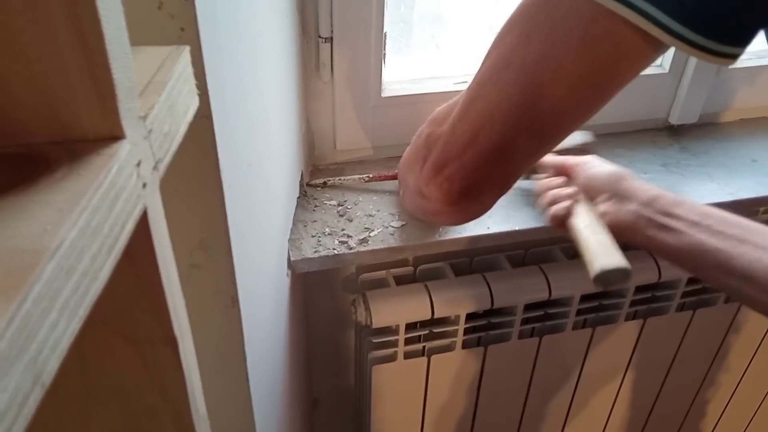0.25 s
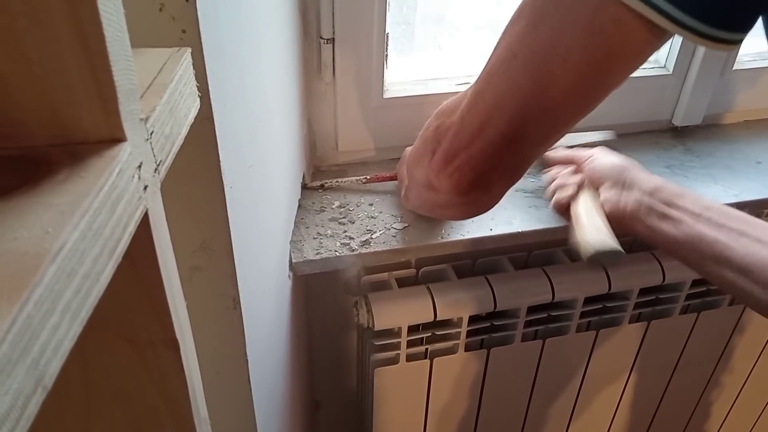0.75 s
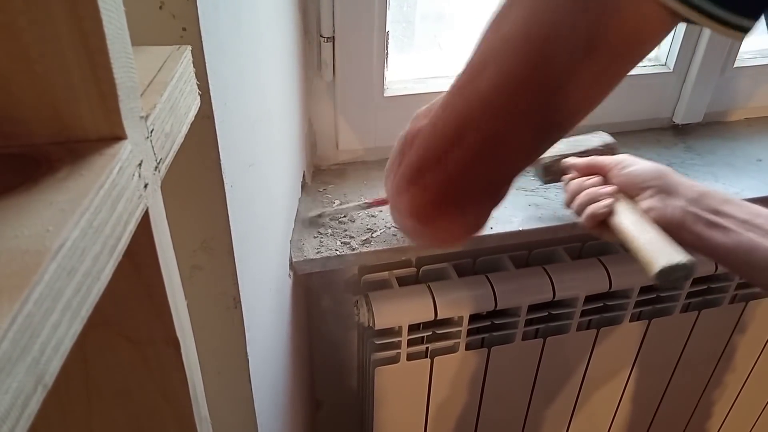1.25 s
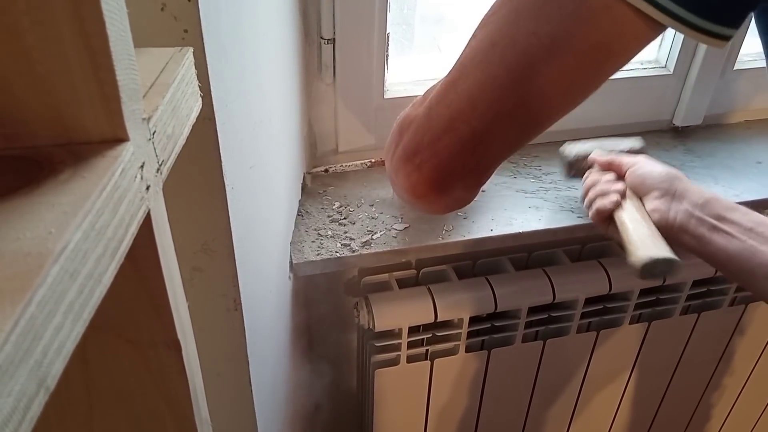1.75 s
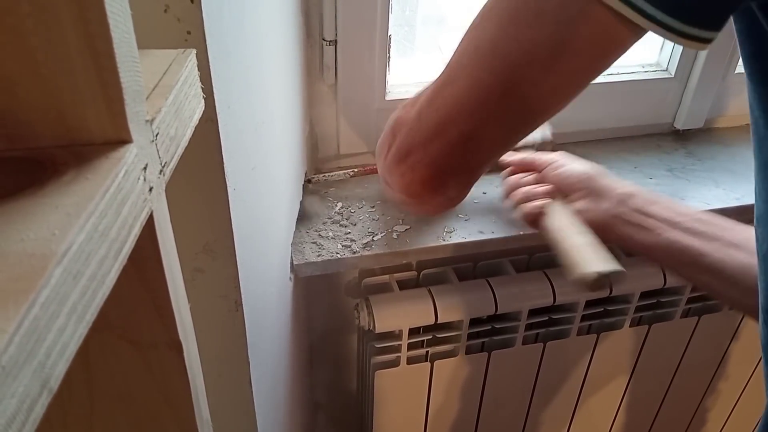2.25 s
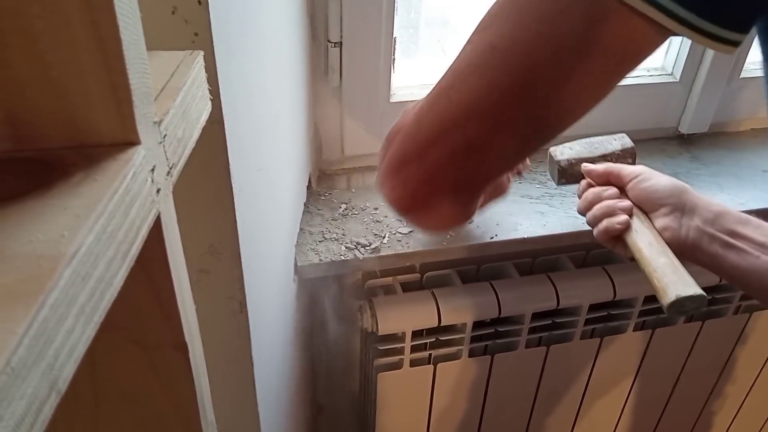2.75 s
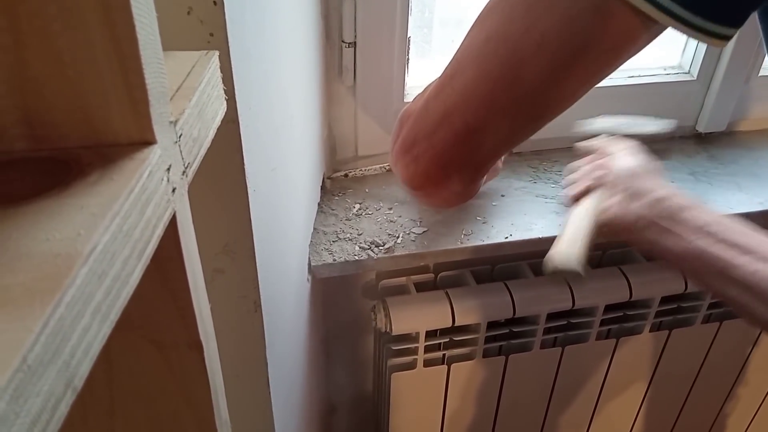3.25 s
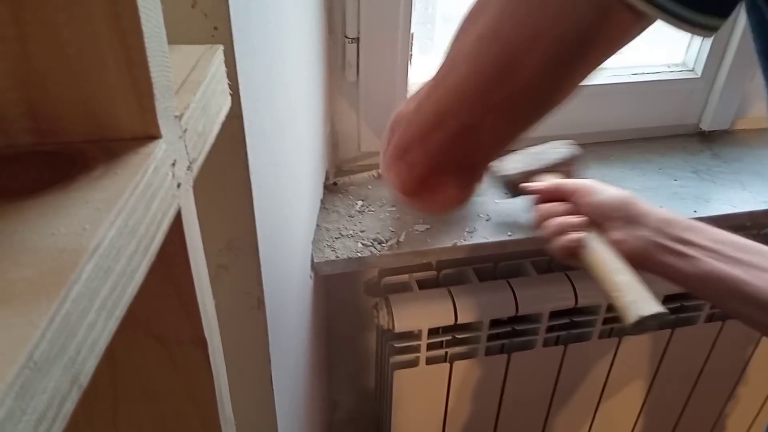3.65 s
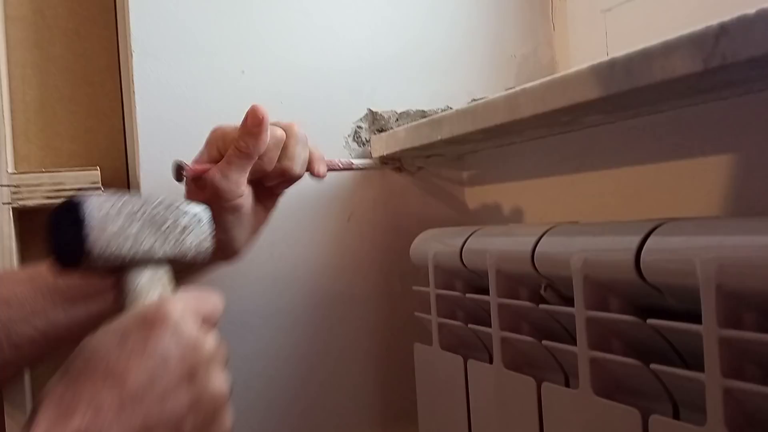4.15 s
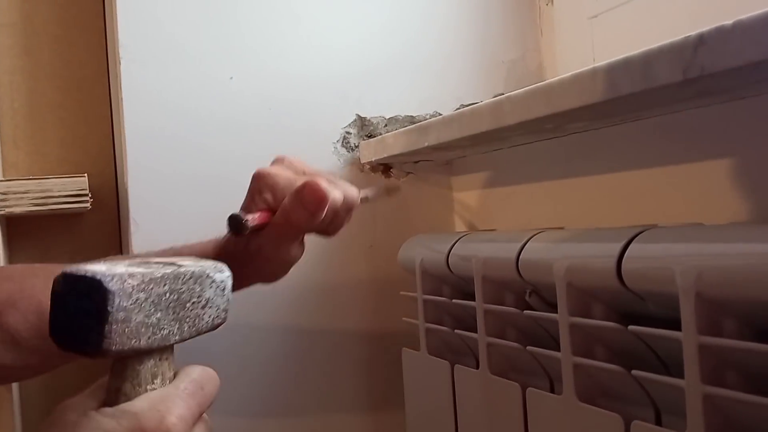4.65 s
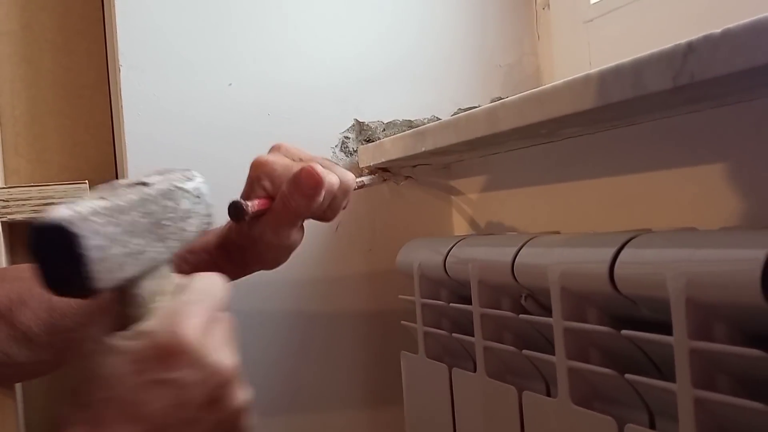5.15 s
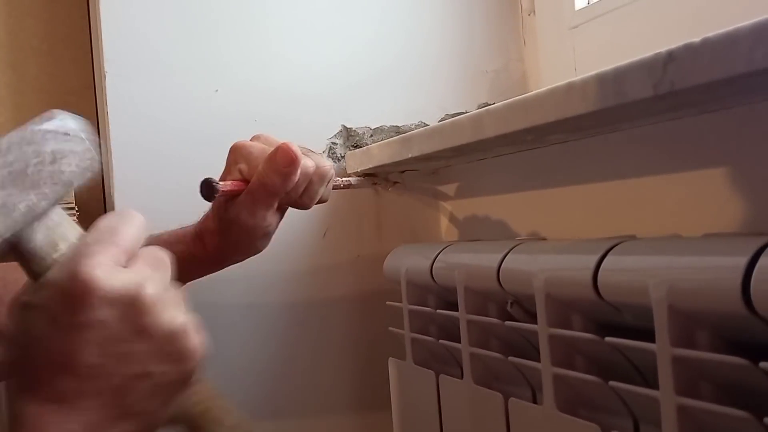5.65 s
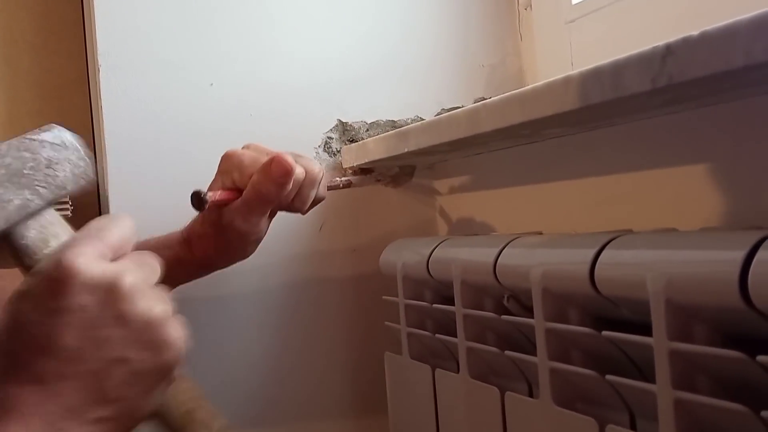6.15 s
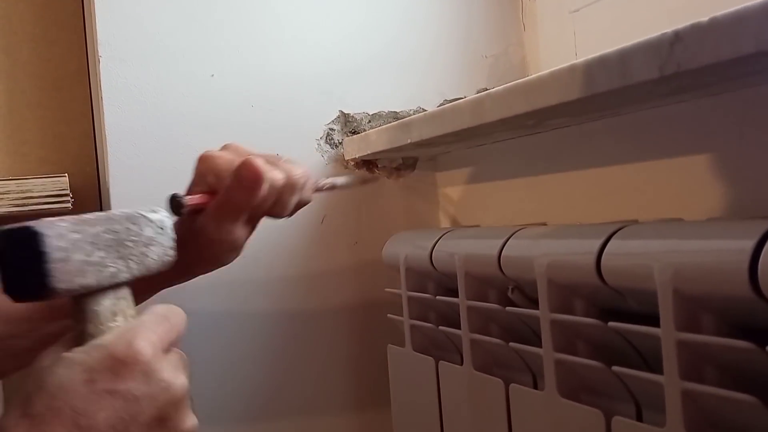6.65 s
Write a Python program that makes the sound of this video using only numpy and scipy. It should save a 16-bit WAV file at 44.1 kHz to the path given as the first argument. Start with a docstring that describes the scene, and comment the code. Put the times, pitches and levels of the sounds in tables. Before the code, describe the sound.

Close, nearly mono sound of chiselling in a hard-walled room: five sharp steel-on-steel blows, a pause with a dull bump, three heavier strikes, then stone fragments knocking and clicking between two isolated blows. Sound cuts out briefly, returning with a resonant radiator clang, light skipping taps, and a final steady run of blows with scraping and hollow slab resonance.

```python
"""Chiselling mortar in a bare room

A lump hammer drives a steel chisel into the mortar round a stone window sill: each blow is a noise crack
through the wedged blade's resonances, with low thuds, sine pings and diffuse echo. Chips snap as short
noise, the blade scrapes in clumped noise; after a short silence the chisel clangs on a radiator (dense
noise and dying sines) and work goes on below the sill. A limiter flattens the blows; the room swells behind."""
import sys
import numpy as np
from scipy import signal
from scipy.fft import rfft, irfft
from scipy.io import wavfile
from scipy.ndimage import uniform_filter1d, minimum_filter1d

SR = 44100
rng = np.random.default_rng(int(sys.argv[2]) if len(sys.argv) > 2 else 0)


def generate_wav(sig):
    """Save sig (samples, or channels by samples) to the path in sys.argv[1] as 16-bit PCM at SR."""
    pcm = np.round(np.clip(np.atleast_2d(sig).T, -1, 1) * 32767).astype(np.int16)
    wavfile.write(sys.argv[1], SR, pcm)


N = 303408
T = np.arange(SR) / SR  # one second: the life of any single sound
HZ = np.fft.rfftfreq(SR, 1 / SR) + 1  # kept above zero for the logarithms

# hammer blows: [t/s, force/dB, crack length/s, wall thud re force/dB, brightness/(dB per octave),
# steel ping level/dB, top ring/dB, pitch of the wedged blade/ratio, depth of its resonances/ratio]
BLOWS = [(0.179, -22, 0.0081, -14, 0, -43, -2, 1.01, 0.49),
         (0.4407, -19, 0.011, -18, 0.5, -34, -3, 0.95, 1.3),
         (0.6774, -20.5, .012, -3.5, -0.5, -45, 0, 1, 0.99),
         (0.905, -17.5, .012, -5, 0.5, -35, 2, 0.952, 1.3),
         (1.1095, -18.5, .012, -14, 0, -32, -5, 0.96, 1.18),
         (1.9832, -21.5, 0.015, 0, 1.66, -51, 0, 1, 0.71),
         (2.2295, -20.5, 0.014, 1.5, 1, -40, 14.5, 0.98, 1.44),
         (2.4709, -17, 0.014, -4.5, 2, -39, -8, 1.24, 0.23),
         (3.3406, -22, 0.011, 1, 0, -54, 11, 0.99, 1.25),
         (4.0125, -30.5, 0.0095, 0.5, 1, -48.5, -4, 1.1, 0.56),
         (5.2707, -24.5, 0.0093, -7.5, 0.05, -71, 1, 1.03, 0.28),
         (5.5209, -17.5, 0.013, -8.5, 1, -48, 4, 0.99, 0.91),
         (5.7656, -16.5, 0.017, -3, 1.5, -39, 3, 0.97, 1.26),
         (6.0285, -18.5, 0.011, -34, 0.7, -41, -11, 0.96, 0.68),
         (6.2676, -15.5, 0.014, -12, 0.5, -44, 15, 0.91, 0.93)]


def amp(db):
    """Decibels to a linear factor."""
    return 10 ** (np.asarray(db) / 20)


def evened(x):
    """The signal at unit RMS."""
    return x / np.sqrt(np.mean(x ** 2) + 1e-20)


def read(points, hz):
    """A curve through (f/Hz, value) points, straight over log frequency."""
    f, value = np.transpose(points)
    return np.interp(np.log(hz + 1), np.log(f), value)


def add(mix, s, sound):
    """Lay a sound into the mix at s seconds, cut at the end of the mix."""
    part = mix[round(s * SR):][:len(sound)]
    part += sound[:len(part)]


def noise(shape_db):
    """One second of unit-RMS noise with the given spectral shape."""
    return evened(irfft(rfft(rng.standard_normal(SR)) * amp(shape_db), SR))


def hump(hz, octaves, depth_db=34, steepness=1.39):
    """A broad flat-topped resonance in dB, with level skirts."""
    distance = abs(np.log2(HZ / hz) / octaves)
    return -depth_db * np.tanh(6.6 * distance ** steepness / depth_db)


def peak(hz, half_width_hz):
    """A narrow resonance of height one."""
    return 1 / (1 + ((HZ - hz) / half_width_hz) ** 2)


def ripple(width_hz):
    """Random peaks and dips of unit size along the spectrum, as from many close modes."""
    smoothing = np.exp(-(HZ / SR * width_hz * 2) ** 2)
    return evened(irfft(rfft(rng.standard_normal(SR)) * smoothing, SR)[:len(HZ)])


def ring(modes):
    """Dying sines, one per mode, each struck a little differently every time."""
    total = 0
    for hz, db, t60 in modes:
        level_db = db + 2 * rng.standard_normal() - 60 * T / t60
        total = total + amp(level_db) * np.sin(2 * np.pi * (hz * T + rng.random()))
    return total


def die_away(x, t60s):
    """Each frequency band dies at its own speed."""
    hz, t, z = signal.stft(x, SR, nperseg=256)
    decay = amp(-60 * t / read(t60s, hz)[:, None])
    return signal.istft(z * decay, SR, nperseg=256)[1][:SR]


def room(shape_db, build_s=0.014):
    """The diffuse answer of bare walls to a click of this spectrum: it builds up, then the bands decay."""
    # decay of the room: [f/Hz, t60/s]
    room_t60 = [(80, 0.75), (210, 0.73), (560, 0.7), (1470, 0.57), (3880, 0.46), (7000, 0.43),
                (14000, 0.26)]
    return die_away(noise(shape_db), room_t60) * (1 - np.exp(-T / build_s))


def boom(db, hz, t60):
    """A low, narrow resonance of masonry dying away."""
    return amp(db - 60 * T / t60) * noise(hump(hz, 0.21, 70, steepness=3.0))


def snap(db, hz, t60, room_db, octaves, uneven_db=2.5):
    """Stone hardly rings: a short dry snap and its echo."""
    stone = [(60, -21.5), (300, 8.5), (7500, -5.0), (12000, -18.5), (16000, -2.5)]  # [f/Hz, tone/dB]
    shape = hump(hz, octaves) + uneven_db * ripple(160) + read(stone, HZ)
    direct = noise(shape) * amp(-60 * T / t60)
    return amp(db) * (direct + amp(room_db) * room(shape))


def trickle(per_s=22, grain_db=7, grit_db=-61, hush_db=-67):
    """Loose sand trickles as random grain bursts from the first blow on, over the steady hush of the room."""
    # spectrum of the room's hush: [f/Hz, relative density/(dB per Hz)]
    hush_spectrum = [(30, -23.5), (110, -4), (500, -1.5), (1500, -17), (4000, -17), (7000, -4),
                     (12000, -24), (16000, -25)]
    hits = rng.random(N) < per_s / SR
    falls = hits * amp(grain_db * np.minimum(rng.exponential(1, N), 2))
    grain = noise(read([(500, 6.0), (3000, 5.5), (6800, 0.0), (9000, 3.5), (12000, -15.0)], HZ))
    decay = amp(-60 * T / 0.068) + amp(-8.5 - 60 * T / 0.12)  # a short fall and a quieter, longer one
    grit = signal.oaconvolve(falls, grain * decay)[:N]
    worked = np.arange(N) / SR > BLOWS[0][0]
    hz = np.fft.rfftfreq(N, 1 / SR)
    hush = evened(irfft(rfft(rng.standard_normal(N)) * amp(read(hush_spectrum, hz)), N))
    return amp(grit_db) * evened(grit) * worked + amp(hush_db) * hush


def masonry():
    """The wall booms once under a bump; the slab of the sill answers the last two blows hollowly."""
    # a dull bump against the wall: [t/s, level/dB, f/Hz, t60/s]
    bumps = [(1.607, -39, 113, .62)]
    # blows that shake the slab: [t/s, level/dB]
    slab_booms = [(6.029, -22.5), (6.268, -16)]
    # hollow resonances of the slab: [f/Hz, level re boom/dB, t60/s]
    slab = [(264, -5.5, 0.41), (376, -7.5, 0.3)]
    out = np.zeros(N)
    for s, *bump in bumps:
        add(out, s, boom(*bump))
    for s, level in slab_booms:
        add(out, s, sum(boom(level + db, hz, t60) for hz, db, t60 in slab))
    return out


def radiator(fins_db=-18, sections_db=-29, uneven_db=5):
    """The struck radiator's dense ring fades in, then dies with a few sections singing on."""
    # level of the fade-in: [t/s, level/dB]
    fade_in = [(4.265, -18.5), (4.315, -14), (4.365, -2.5), (4.45, -0.5)]
    # spectrum of the fins: [f/Hz, relative density/(dB per Hz)]
    fin_spectrum = [(100, -20.5), (300, -18), (480, -8), (660, 1), (950, -11), (1300, -5), (1900, 2.5),
                    (2250, -11.5), (2800, -3.5), (3400, -8), (4000, -16), (7000, -17), (12000, -44)]
    # ringing sections: [f/Hz, relative level/dB, t60/s]
    sections = [(269, -19, 2), (382, -4.5, 1.36), (481, 3, 1), (530, -2, 1.2), (572, -3, 1.23),
                (659, -1, 1.11), (1280, -12.5, 1.46), (1322, -12.5, 1.65), (1430, -16, 0.55),
                (1653, -19, 0.63), (1750, -11, 1), (2050, -16, 0.47), (2000, 5.5, 0.77), (1970, -0.5, 1.07),
                (2712, 11.5, 0.37), (2740, -7.5, 1.12), (2660, 8, 0.36), (3230, -18.5, 1.8)]
    start = fade_in[0][0]
    clang = noise(read(fin_spectrum, HZ) + uneven_db * ripple(4.1))
    fins = die_away(clang, [(300, 1.0), (2000, 0.93), (7000, 0.76)])
    level = amp(np.interp(start + T, *np.transpose(fade_in))) * np.minimum(T / 0.0021, 1)
    out = np.zeros(N)
    add(out, start, level * (amp(fins_db) * fins + amp(sections_db) * ring(sections)))
    return out


def scrapes(grain_db=2.5, room_db=-11, uneven_db=3):
    """Sand grains break under the blade in clumps: band noise with a grainy level, swelling and fading."""
    # strokes in mortar: [t/s, length/s, level before the swell/dB, centre f/Hz, width/octaves]
    strokes = [(2.441, 0.015, -36.5, 5700, 0.72), (3.733, .02, -42.5, 5500, 2.1),
               (3.779, 0.02, -41.5, 5500, 3.6), (4.208, 0.23, -46, 2500, 1.4),
               (4.237, 0.13, -38, 5950, .53), (5.082, 0.037, -48, 2560, 3.5),
               (5.891, 0.077, -28.5, 6240, 0.67), (5.922, 0.1, -28.5, 1480, 1.03),
               (6.803, 0.024, -39.5, 6680, .6), (6.83, 0.048, -36.5, 3500, 3)]
    out = np.zeros(N)
    for s, length, db, hz, octaves in strokes:
        shape = hump(hz, octaves, steepness=3.8) + uneven_db * ripple(200)
        shape += read([(7500, 3.5), (12000, -3.5)], HZ)
        swell = np.sin(np.pi * np.minimum(T / length, 1)).clip(0) ** .5
        clumps = amp(grain_db * evened(uniform_filter1d(rng.standard_normal(SR), size=90)))
        direct = evened(noise(shape) * clumps) * swell
        add(out, s, amp(db) * (direct + amp(room_db) * room(shape, length / 2)))
    return out


def loose_chisel(count=4, waver=0.75, start_s=4.543, every_s=.118, first_db=-28.5, fade_db=-3):
    """Out of the mortar the steel rings freely in its modes; its tip skips evenly over the radiator's ribs."""
    # clinks: [t/s, level/dB]
    clinks = [(3.598, -37.5), (3.739, -49), (3.797, -44), (4.243, -36)]
    # lengthwise and bending modes of the steel: [f/Hz, relative level/dB, t60/s]
    steel = [(4550, 0.5, 0.1), (7020, 6, 0.095), (10360, 3, 0.085), (11340, -14.5, 0.62),
             (13400, -26.5, .16), (14500, -10, 0.27)]
    out = np.zeros(N)
    for s, db in clinks:
        # reflections blur the lines
        flutter = 1 + waver * evened(uniform_filter1d(rng.standard_normal(SR), size=200))
        add(out, s, amp(db) * ring(steel) * flutter * (1 - np.exp(-T / 0.00085)))
    for k in range(count):
        # each skip is lighter than the last
        skip = snap(first_db + k * fade_db, hz=7340, t60=0.049, octaves=0.65, room_db=-15)
        add(out, start_s + k * every_s, skip)
    return out


def chips():
    """Lumps knock dully, chips snap over a wide band, the tip ticks high and narrow: all short noise."""
    # lumps of mortar knock on the sill: [t/s, level/dB, centre f/Hz, t60/s]
    knocks = [(1.589, -41.5, 860, 0.078), (1.61, -21.5, 800, 0.069), (2.88, -24, 660, 0.04),
              (2.929, -23, 870, .04), (3.052, -18.5, 820, .022), (3.132, -29, 740, .017),
              (3.177, -34, 750, .025), (3.3235, -31, 900, .017), (3.7994, -27, 1520, 0.039),
              (5.112, -46, 700, 0.088)]
    # chips snap off: [t/s, level/dB, centre f/Hz, t60/s, room re snap/dB]
    chipped = [(1.256, -26, 2420, 0.031, -19), (2.6, -26.5, 5100, 0.11, -12),
               (2.8796, -19.5, 3270, 0.032, -6.5), (3.099, -27.5, 2944, 0.029, -14.5),
               (3.598, -16.5, 2660, 0.023, -17.5), (3.865, -19, 4570, .054, -12),
               (6.176, -20, 5450, 0.023, -16), (6.244, -22, 3140, 0.042, -32),
               (6.471, -27.5, 2080, .038, -15), (6.627, -27, 2960, 0.039, -10.5),
               (6.721, -25.5, 4550, 0.036, -13)]
    # the tip of the blade ticks on stone, and at 6.563 s the blade squeaks with a longer ring: [t/s, level/dB,
    # centre f/Hz, t60/s]
    ticks = [(1.782, -33, 6950, 0.049), (3.063, -29.5, 7300, 0.038), (3.918, -28, 6760, 0.06),
             (6.206, -29, 6700, 0.044), (6.232, -33, 6500, 0.035), (6.522, -36, 5600, 0.061),
             (6.563, -27.5, 8100, 0.22), (6.653, -26, 7800, 0.092)]
    out = np.zeros(N)
    for s, *knock in knocks:
        add(out, s, snap(*knock, octaves=1.0, room_db=-16.5))
    for s, *chip in chipped:
        add(out, s, snap(*chip, octaves=1.42))
    for s, *tick in ticks:
        add(out, s, snap(*tick, octaves=0.36, room_db=-10.5))
    return out


def blows(crack_db=19, room_db=2.5, ring_width_hz=230, between_db=-3, uneven_db=3.0, top_ring_db=8,
          thud_db=15, thud_hz=140, thud_t60=0.023, knock_db=12, knock_hz=235, knock_t60=.03):
    """Steel meets steel: a dense crack, a push into the wall, the wall's boom, the chisel's ping, the room."""
    # resonances of the blade wedged in the corner: [f/Hz, height/dB]
    in_corner = [(880, 0.5), (2180, 6.5), (3200, 3), (3600, 5.5), (5500, 0.5), (6130, 9.5), (7450, 1),
                 (8700, 3.5)]
    # and in the joint under the window frame: [f/Hz, height/dB]
    in_frame_joint = [(850, 5), (2400, 7), (3100, 7), (4780, 8), (6200, 3), (7250, 6), (10300, 3)]
    # and under the sill: [f/Hz, height/dB]
    under_sill = [(620, 6.5), (2100, 7.5), (2930, 9.5), (4480, 14), (5200, 5), (6620, 6.5), (7280, 9.5),
                  (9300, 4.5)]
    # where the chisel is set: [from t/s, resonances, wall boom f/Hz, boom re force/dB, boom t60/s]
    seats = [(0, in_corner, 118.5, -18, 0.65),
             (1.9, in_frame_joint, 112, -31, 0.71),
             (5.0, under_sill, 89, -20, 1)]
    # spectrum of the crack: [f/Hz, relative density/(dB per Hz)]
    crack_spectrum = [(60, -25.5), (200, -2), (600, 4.5), (1200, 2), (2300, 1), (3800, 0), (5500, 2.5),
                      (7400, 0.5), (9000, -3.5), (11000, -10.5), (12800, -16.5), (14700, -14), (16000, 1.5)]
    # spectrum of the room's answer: [f/Hz, relative density/(dB per Hz)]
    room_spectrum = [(50, -21), (110, -2), (200, 2.5), (330, -0.5), (520, 2), (850, 2), (1200, 1),
                     (2400, 1), (3800, -0.5), (5500, 3.5), (7400, 3.5), (9000, -1.5), (12600, -16),
                     (14600, -8.5), (16000, -3)]
    # the chisel's clearest ping, a beating pair: [f/Hz, relative level/dB, t60/s]
    ping_pair = [(11445, 0, .55), (11431, -7, .45)]
    out = np.zeros(N)
    for s, force, crack_s, thud, bright, ping, top, pitch, depth in BLOWS:
        _, rings, boom_hz, boom_db, boom_t60 = [seat for seat in seats if seat[0] <= s][-1]
        # the resonances shift with the way the blade is wedged
        wedged = depth * sum(db * peak(hz * pitch, ring_width_hz) for hz, db in rings)
        wedged += between_db * ((HZ > 600) & (HZ < 10000)) + uneven_db * ripple(57.6)
        tilt = bright * np.log2(np.clip(HZ, 500, 8000) / 2500)
        # the highest modes of the steel sing through every blow
        top_ring = top * peak(14550, 600) + top_ring_db * peak(14520, 150) + 4 * peak(13400, 150)
        colour = wedged + tilt + top_ring

        burst = np.exp(-(T / crack_s) ** 2) * (1 - np.exp(-T / 0.00047))
        crack = amp(crack_db) * noise(read(crack_spectrum, HZ) + colour) * burst
        push = amp(thud_db - 60 * T / thud_t60) * np.sin(2 * np.pi * thud_hz * T)
        push += amp(knock_db - 60 * T / knock_t60) * np.sin(2 * np.pi * knock_hz * T)
        push *= 1 - np.exp(-T / 0.00092)
        echo = amp(room_db) * room(read(room_spectrum, HZ) + colour)
        struck = crack + amp(thud) * push + echo + boom(boom_db, boom_hz, boom_t60)
        add(out, s, amp(force) * struck + amp(ping) * ring(ping_pair))
    return out


def scene(side_db=-26, side_hz=5200):
    """Nearly mono: the same sound in both channels, with a faint treble difference."""
    mid = trickle() + masonry() + radiator() + scrapes() + loose_chisel() + chips() + blows()
    hz, t, z = signal.stft(mid, SR, nperseg=128)
    random_phase = np.exp(2j * np.pi * rng.random(z.shape))
    treble = 1 / (1 + (side_hz / (hz[:, None] + 1)) ** 12)
    blurred = z * np.sqrt(2) * random_phase * treble
    side = amp(side_db) * signal.istft(blurred, SR, nperseg=128)[1][:N]
    return np.array([mid + side, mid - side])


def record(dry, limit_db=-14.5, recover_db_per_s=245, low_cut_hz=58, ceiling=1.0, edge_hz=15880):
    """A bass cut, a fast limiter with a soft ceiling, a moment of silence, then the band limit."""
    # the silent moment: [from t/s, to t/s]
    silence = (4.052, 4.19)
    dry = signal.sosfilt(signal.butter(2, low_cut_hz, "high", fs=SR, output="sos"), dry)
    power_db = 10 * np.log10(abs(uniform_filter1d((dry ** 2).mean(0), size=88)) + 1e-12)
    held_db = -minimum_filter1d(-power_db, size=441, origin=220)  # holds each peak for 10 ms
    t = np.arange(N) / SR
    fall = t * recover_db_per_s
    # the level jumps up at once and sinks at a steady rate
    level_db = np.maximum.accumulate(held_db + fall) - fall
    over_db = np.maximum(level_db - limit_db, 0)
    gain_cut = amp(uniform_filter1d(over_db, size=40))
    limited = ceiling * np.tanh(dry / gain_cut / ceiling)
    live = uniform_filter1d(1. * ((t < silence[0]) | (t > silence[1])), size=100)
    band_limit = signal.firwin(255, edge_hz, window=("kaiser", 8), fs=SR)
    return signal.oaconvolve(limited * live, band_limit[None], "same")


dry = scene()
out = record(dry)
generate_wav(out)
```